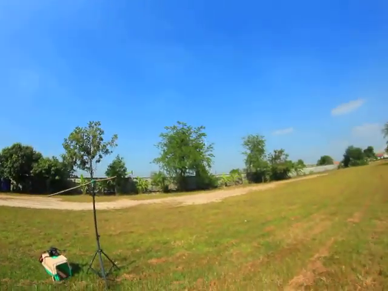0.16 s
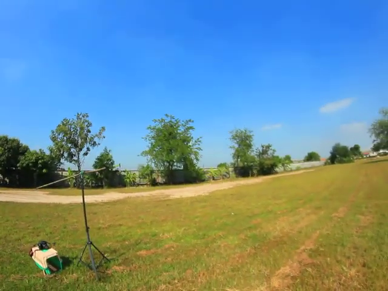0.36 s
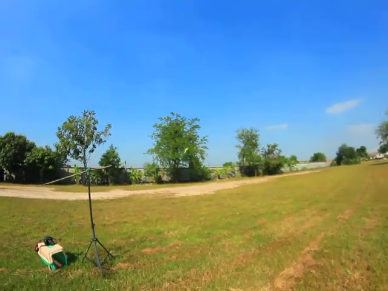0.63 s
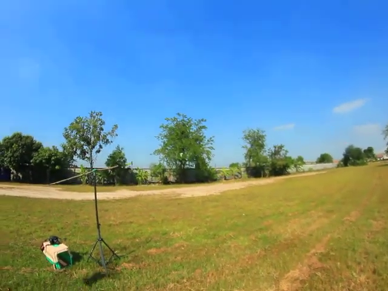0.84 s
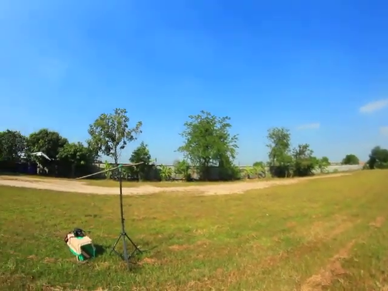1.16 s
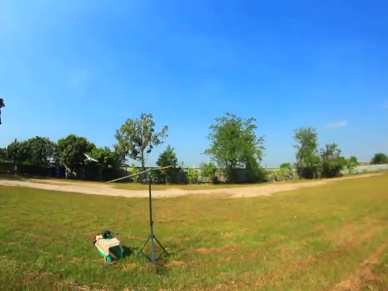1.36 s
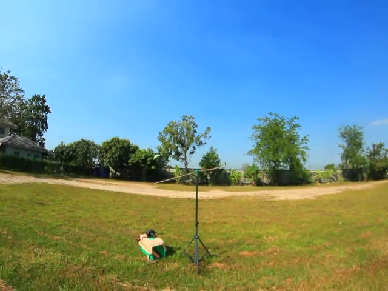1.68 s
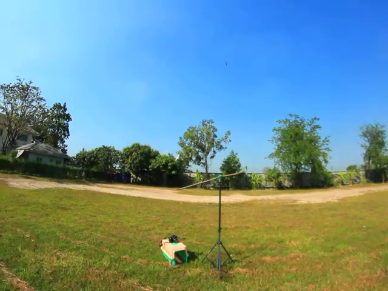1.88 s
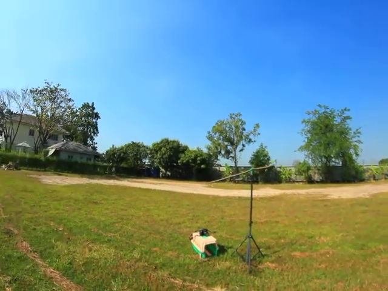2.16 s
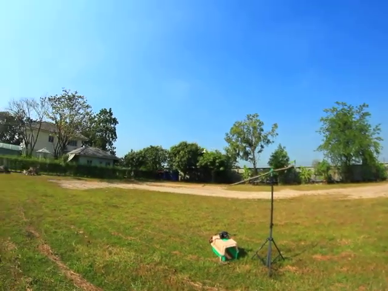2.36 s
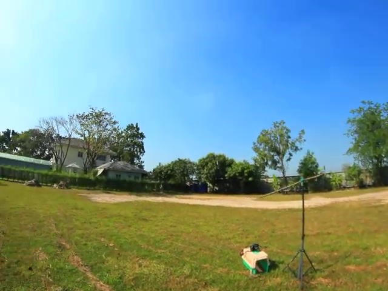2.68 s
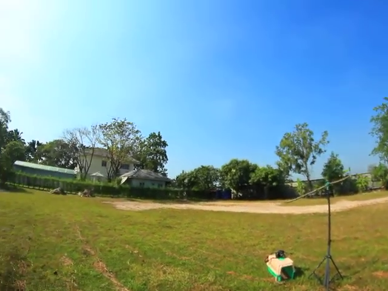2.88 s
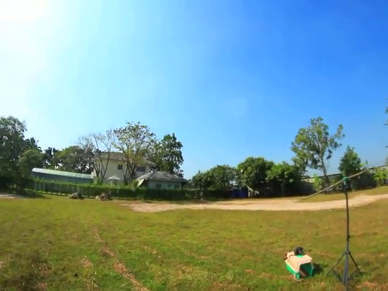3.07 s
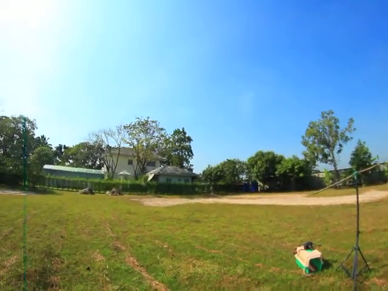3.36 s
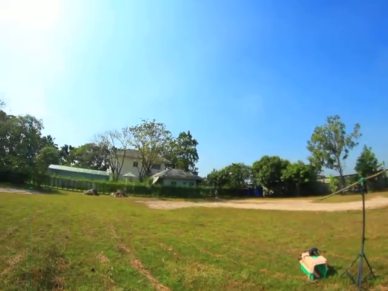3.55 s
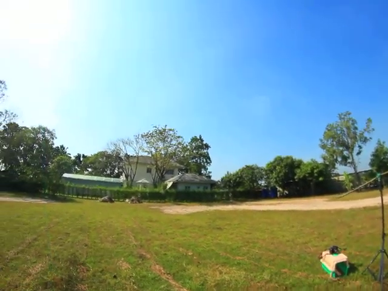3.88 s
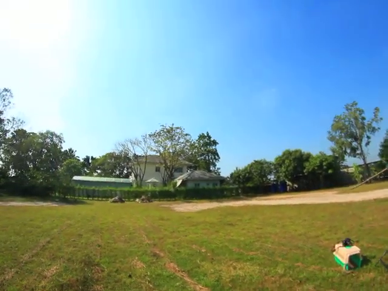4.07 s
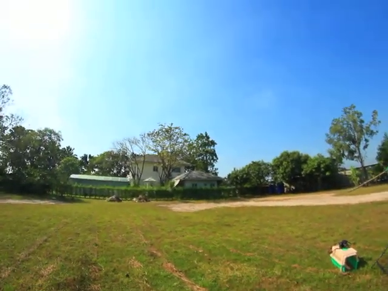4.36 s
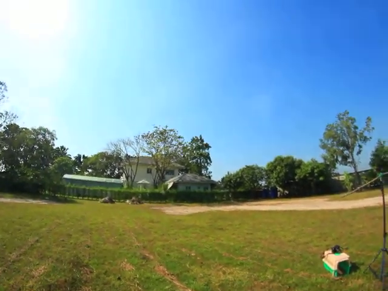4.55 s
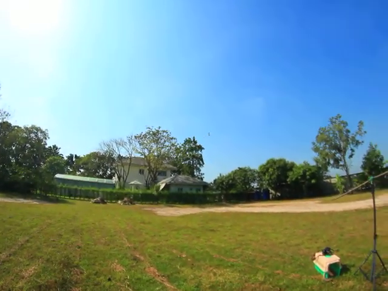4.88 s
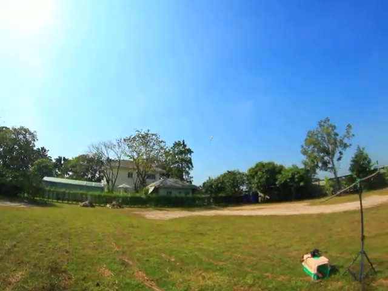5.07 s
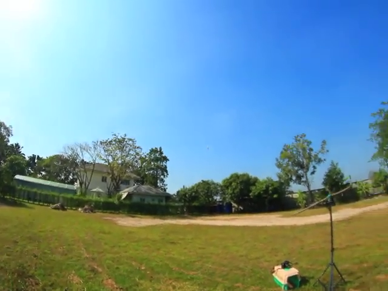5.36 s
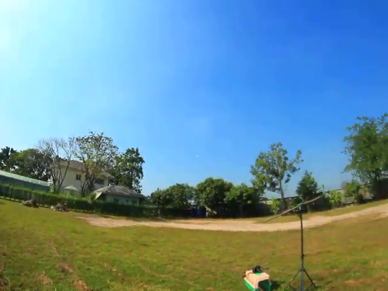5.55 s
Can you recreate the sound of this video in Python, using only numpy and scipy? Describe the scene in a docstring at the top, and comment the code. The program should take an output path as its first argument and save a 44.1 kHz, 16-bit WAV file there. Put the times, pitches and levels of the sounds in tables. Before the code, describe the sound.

A mono outdoor scene in an open grassy field, with a soft, low background hush. In the first second, faint far galah cockatoos give thin, high held notes that slur downward, with a slight grass rustle near 0.8 s. At 1.5 and 1.7 s nearer birds shriek loudly: quick, piercing two-note cries that crack and end in a rasp. A wind thump lands near 1.95 s. From 2.2 to 2.6 s comes a rapid tangle of squeaky whistles and shrill buzzes, then low throaty squawks and piping until 3.1 s, when a long harsh screech grates for a third of a second. A lull follows, with a wind bump at 3.7 s and tiny rising chirps. A far call at 3.95 s leads to piping, another shriek and a longer screech around 4.25 s. Gusts rumble on; a faint call and a final shriek come near 5.5 s. Light echoes trail the calls.

```python
"""Far galah cockatoos call first, held notes that slur downward, over the soft hush of an open field.
Nearer galahs then join in: two-note shrieks that crack and end in a rasp, low squawks, long harsh screeches.
Pure notes are unsteady sines; harsh ones are trains of sharp pulses with puffs of air, shaped by a throat.
A small bird chirps in rising sines, and trees and houses throw the calls back as echoes and a noisy tail.
Gusts buffet the microphone as swells of low, filtered noise."""
import sys
import numpy as np
from scipy import signal
from scipy.fft import rfft, irfft, next_fast_len
from scipy.io import wavfile
from scipy.ndimage import uniform_filter1d

SR = 44100
rng = np.random.default_rng(int(sys.argv[2]) if len(sys.argv) > 2 else 0)


def log_audio(samples):
    """Write samples as a 16-bit WAV file to the path given in sys.argv[1]."""
    # one column per channel
    frames = np.atleast_2d(samples).T
    # limit to full scale, then quantise
    limited = np.clip(frames, -1, 1)
    pcm = np.round(limited * 32767).astype(np.int16)
    wavfile.write(sys.argv[1], SR, pcm)


N = 252252
TIME = np.arange(N) / SR   # seconds
CUTOFF_HZ = 15700   # nothing much is heard above this

# short whistles among the rasps, the first inside the far bird's burst: (start_s, length_s, first_pitch_hz,
# last_pitch_hz, level_db)
WHISTLES = [ (0.415, 0.025, 3540, 3030, -34), (2.222, .016, 3110, 3420, -23),
            (2.263, 0.031, 4360, 4400, -19.5), (2.284, 0.03, 3860, 3680, -23),
            (2.309, 0.073, 2855, 2740, -29.5), (2.357, 0.036, 4100, 3900, -27),
            (2.422, 0.053, 3870, 4180, -26.5), (2.468, 0.021, 4920, 5280, -20.5),
            (2.499, 0.016, 6500, 5900, -28.5), (2.501, 0.011, 4180, 4150, -23),
            (2.517, .014, 5040, 4570, -23), (4.372, 0.083, 5466, 5280, -32.5),
            (5.681, .026, 2780, 3030, -29)]
# shrill rasps, the first a faint rough burst from a far bird: (start_s, length_s, first_pulse_rate_hz,
# last_pulse_rate_hz, level_db, # swell_db over the length, roughness 0-1)
RASPS = [ (0.407, 0.0324, 862, 730, -45, 4, 0.74), (1.458, .016, 990, 1000, -40, -2, 0),
         (1.694, 0.026, 698, 736, -21, 20, 0.84), (2.199, 0.029, 547, 631, -25, 14, .15),
         (2.224, 0.046, 625.5, 731, -19.5, -3, 0.62), (2.285, 0.033, 896, 794, -24, -3, 0.8),
         (2.306, .075, 731, 658, -24.5, -12, .95), (2.377, .046, 880, 998, -28.5, 1, 0.47),
         (2.422, .060, 942, 1276, -26.5, -3, 0.7), (2.532, 0.078, 1015, 1029, -33.5, -1, 0.5),
         (4.033, 0.035, 700, 734, -40.5, 3, .95), (4.244, 0.022, 690, 740, -33, 2, 0.92),
         (5.645, 0.04, 990, 1000, -37, 9, 0.77)]
# the near birds sound duller when they face away: (time_s, treble_db)
FACING = [(1.9, -5), (2.2, -11), (2.55, -7), (4.3, -2.5), (5.55, -5)]


def near_galahs():
    """Shrieks, and whistles among shrill rasps, with a treble that follows where the birds face. The faint
    rough burst near 0.41 s comes from a far bird but is played the same way."""
    calls = shrieks()
    for start, length, first_hz, last_hz, db in WHISTLES:
        hz = glide(length, first_hz, last_hz, arch=0.0087)
        tone = whistle(hz, jitter=0.014, flutter_db=4.5, overtone_db=-21)
        add(calls, start, tone, db, attack=0.0029, release=0.006)
    for start, length, first_hz, last_hz, db, swell_db, rough in RASPS:
        buzz = rasp(glide(length, first_hz, last_hz), rough)
        add(calls, start, buzz, db, attack=0.006, release=0.0077, swell_db=swell_db)
    body, treble = split(calls, hz=6050)
    treble_gain = from_db(np.interp(TIME, *np.transpose(FACING)))
    return outdoors(body + treble_gain * treble, scatter_db=-11.5, t60=0.75, ground_db=-34)


LEAP_S = 0.004   # time scale of the leap, the crack's dip and the final drop
CRACK_S, CRACK_PULSES_HZ, CRACK_SWELL_DB = 0.019, (1018, 1114), 4
CLOSING_S, CLOSING_PULSES_HZ, CLOSING_FADE_DB = 0.0318, (884, 776.4), -8
CROAK_DB = -8   # the low croak, relative to the start of the closing rasp
FUNDAMENTAL_DB = -14.5   # the pulse rate itself hums under a crack or a closing rasp
# a shriek is a scooping lead-in, a leap to two arched notes with a crack between them, and a closing rasp:
# (start_s, lead_in_s, first_note_s, second_note_s, lead_in_pitch_hz, first_pitch_hz, crack_pitch_hz,
#  second_pitch_hz, last_pitch_hz, lead_in_level_db, notes_level_db, crack_level_db, closing_level_db)
SHRIEKS = [ (1.462, .027, 0.039, 0.052, 3980, 5480, 5090, 5710, 5290, -26, -15, -21.5, -18),
           (1.717, 0.024, .051, .053, 4170, 5620, 5090, 5690, 5550, -12.5, -14.5, -14, -19.5),
           (4.246, .025, .052, .050, 3900, 5370, 5230, 5514, 5320, -28.5, -21.5, -26.5, -28),
           (5.588, .012, 0.023, .083, 3380, 4980, 4734, 4840, 4840, -16.5, -17, -24, -27)]


def shrieks():
    """Each shriek buzzes where it cracks and collapses into a rasp with a low croak."""
    out = np.zeros(N)
    cracking = glide(CRACK_S, *CRACK_PULSES_HZ)
    closing = glide(CLOSING_S, *CLOSING_PULSES_HZ)
    for start, lead, first, second, *pitches, lead_db, db, crack_db, closing_db in SHRIEKS:
        crack = start + lead + first
        end = crack + second
        tone = shriek_tone(lead, first, second, *pitches, lead_db, db)
        add(out, start, tone, 0, attack=0.005, release=0.0034)
        add(out, crack, rasp(cracking, rough=0.42), crack_db,
            attack=0.0035, release=0.0068, swell_db=CRACK_SWELL_DB)
        # half the fade is added so that the rasp fades from its listed level
        add(out, end - LEAP_S / 2, rasp(closing, rough=0.6), closing_db + CLOSING_FADE_DB / 2,
            attack=0.0031, release=0.0066, swell_db=CLOSING_FADE_DB)
        add(out, end, squawk(closing, rough=0.053), closing_db + CROAK_DB, attack=0.0099, release=0.0075)
        for hum_start, hz, level_db in (crack, cracking, crack_db), (end, closing, closing_db):
            hum = whistle(hz, jitter=0.014, flutter_db=1.5, overtone_db=-21)
            add(out, hum_start, hum, level_db + FUNDAMENTAL_DB, attack=0.0046, release=0.011)
    return out


# shares of pitch: the lead-in curls up, the first note starts flat
LEAD_IN_SCOOP, FIRST_NOTE_SCOOP = 0.085, 0.051
SCOOP_S = 0.0054   # the first note closes most of its gap in pitch this fast
# each note swells, the second by half as much; the tone sinks in the crack
FIRST_NOTE_DB, SECOND_NOTE_DB, SWELL_DB, CRACK_DIP_DB = -2, -0.5, 9, -4.5
LEAD_IN_OVERTONE_DB, NOTE_OVERTONE_DB = -11.5, -20.5   # the high notes are purer than the lead-in


def shriek_tone(lead, first, second, lead_hz, first_hz, crack_hz, second_hz, last_hz, lead_db, db):
    """The pure tone of a shriek: it leaps up from the lead-in, sags into the crack, arches again and drops."""
    crack, end = lead + first, lead + first + second
    t = np.arange(int((end + LEAP_S) * SR)) / SR
    # progress through each part, 0 to 1
    in_lead, in_first, in_second = np.clip([t / lead, (t - lead) / first, (t - crack) / second], 0, 1)
    curling = lead_hz * (1 + LEAD_IN_SCOOP * in_lead ** 2)
    falling = first_hz + (crack_hz - first_hz) * in_first ** 3
    falling = falling * (1 - FIRST_NOTE_SCOOP * np.exp(-in_first * first / SCOOP_S))
    arched = np.polyval(np.polyfit([0, 0.5, 1], [crack_hz, second_hz, last_hz], 2), in_second)
    notes_hz = np.where(t < crack, falling, arched)

    first_db = FIRST_NOTE_DB + SWELL_DB * (in_first - 0.5)
    second_db = SECOND_NOTE_DB + SWELL_DB * (in_second - 0.5) / 2
    notes_db = uniform_filter1d(db + np.where(t < crack, first_db, second_db), size=100)
    notes_db = notes_db + CRACK_DIP_DB * np.exp(-((t - crack - LEAP_S) / LEAP_S) ** 2)

    # 0 on the lead-in pitch, 1 on the high notes, and back to 0 for the drop
    upper = np.interp(t, [lead - LEAP_S / 2, lead + LEAP_S / 2, end - LEAP_S / 2, end + LEAP_S], [0, 1, 1, 0])
    hz = upper * notes_hz + (1 - upper) * curling
    level_db = upper * notes_db + (1 - upper) * lead_db
    overtone_db = upper * NOTE_OVERTONE_DB + (1 - upper) * LEAD_IN_OVERTONE_DB
    return from_db(level_db) * whistle(hz, jitter=0.0099, flutter_db=3.43, overtone_db=overtone_db)


# throat colour of a rasp: (frequency_hz, level_db)
RASP_THROAT = [(500, -20.5), (1050, -13), (1900, -21), (2800, -1.5), (4000, 4), (5400, -0.5), (6500, 1),
               (8500, -5), (11000, -16), (16000, -27)]


def rasp(hz, rough):
    """The shrill, buzzing register: fast pulses through a bright throat."""
    return pulsed(hz, rough, RASP_THROAT, jitter=0.0586, jitter_rate=500, shimmer_db=1.0, hiss=1.6, wander=0.08)


SCREECH_ATTACK_S, SCREECH_RELEASE_S, SCREECH_ROUGHNESS = 0.034, 0.021, 0.58
SCREECH_WOBBLE = 0.022   # typical share of pitch by which a whole screech wavers
# low squawks: (start_s, length_s, first_pulse_rate_hz, last_pulse_rate_hz, level_db, roughness 0-1)
SQUAWKS = [ (2.723, 0.096, 266.2, 282.6, -20.5, 0.39), (2.814, 0.087, 675, 765, -23.5, 0.23),
           (2.878, 0.046, 873, 879, -13, 0.16), (2.915, 0.023, 919, 1065, -16.5, 0.38),
           (2.925, 0.029, 841, 730, -20.5, 0.8), (3.039, 0.055, 702, 644, -23.5, 0.38),
           (4.171, 0.087, 572, 632, -32, 0.47)]
# clear piping notes from other birds of the flock:
# (start_s, length_s, first_pitch_hz, last_pitch_hz, level_db)
PIPES = [ (0.175, .040, 2740, 2800, -42), (0.374, 0.053, 1920, 1700, -42.5),
         (2.837, 0.046, 2830, 3060, -27.5), (3.055, 0.082, 2990, 2948, -27.5),
         (3.150, 0.051, 2830, 2720, -27), (3.931, 0.025, 2300, 3170, -39), (4.071, 0.058, 4150, 3770, -31),
         (4.129, 0.078, 2670, 2618, -29), (4.183, 0.0755, 1143, 1290, -29.5),
         (4.289, 0.039, 2717, 2704, -27)]
# long harsh screeches, arched in pitch:
# (start_s, length_s, first_pulse_rate_hz, last_pulse_rate_hz, arch as a share of pitch, level_db)
SCREECHES = [(3.108, .304, 440.8, 536, 0.01013, -17.5), (4.257, .392, 428.3, 450, .19, -18)]
# partials that ring out of a screech: (multiple of the pulse rate, level_db)
SCREECH_PARTIALS = [(2, -25.5), (3, -14.5), (4, -11.5), (6, -28)]


def squawking_galahs():
    """Low pulsed squawks, nearly pure piping notes and long rough screeches with ringing partials."""
    calls = np.zeros(N)
    for start, length, first_hz, last_hz, db, rough in SQUAWKS:
        voice = squawk(glide(length, first_hz, last_hz), rough)
        add(calls, start, voice, db, attack=0.23 * length, release=0.16 * length, swell_db=6.5)
    for start, length, first_hz, last_hz, db in PIPES:
        tone = whistle(glide(length, first_hz, last_hz), jitter=0.012, flutter_db=4.0, overtone_db=-28)
        add(calls, start, tone, db, attack=0.017, release=0.0065)
    for start, length, first_hz, last_hz, arch, db in SCREECHES:
        hz = glide(length, first_hz, last_hz, arch)
        hz = hz * (1 + SCREECH_WOBBLE * waver(len(hz), 35.01))
        harsh = screech(hz, SCREECH_ROUGHNESS, second_ratio=1.24, second_db=-3)
        ringing = sum(from_db(partial_db) * whistle(k * hz, jitter=0.013, flutter_db=5.5, overtone_db=-38)
                      for k, partial_db in SCREECH_PARTIALS)
        add(calls, start, opening_beak(harsh) + ringing, db, SCREECH_ATTACK_S, SCREECH_RELEASE_S)
    return outdoors(calls, scatter_db=-6, t60=0.82, ground_db=-13.5)


# throat colour of a squawk: (frequency_hz, level_db)
SQUAWK_THROAT = [(300, -31), (600, -25.5), (850, -16.5), (1400, 3.5), (1800, 6), (2450, -10), (3000, -9),
                 (4500, -18), (7000, -34.5), (12000, -58)]


def squawk(hz, rough):
    """The low, throaty register: pulses through a darker throat."""
    return pulsed(hz, rough, SQUAWK_THROAT, jitter=0.11, jitter_rate=400, shimmer_db=7, hiss=3.0, wander=0.07)


# throat colour of a screech: (frequency_hz, level_db)
SCREECH_THROAT = [(350, -32), (600, -29.5), (829, -48), (974, -7.5), (1310, -6), (1440, -3), (1960, 0.5),
                  (2250, -8.5), (2710, -9), (3190, -15), (3750, -11), (5540, -27.5), (5920, -31.5),
                  (6690, -31), (15000, -67)]
# beak and windpipe resonances of a screech: (frequency_hz, width_hz, level_db)
SCREECH_MODES = [(1380, 59, -13), (2760, 150, 3.5)]


def screech(hz, rough, second_ratio, second_db):
    """Two membranes flap at unrelated rates, so their partials cross and tear."""
    first, second = [
        pulsed(hz * ratio, rough, SCREECH_THROAT, jitter=0.0457, jitter_rate=450, shimmer_db=0.0,
               hiss=1.0, wander=0.09, modes=SCREECH_MODES)
        for ratio in (1, second_ratio)]
    return rms_one(first + from_db(second_db) * second)


BEAK_OPEN_DB, BEAK_SHUT_DB = 1.5, -4   # treble of a screech at its middle and at its ends


def opening_beak(sound):
    """The beak opens and closes over a screech, so its middle is brightest."""
    body, treble = split(sound, hz=3050)
    gape = np.sin(np.pi * np.linspace(0, 1, len(sound)))
    return body + from_db(BEAK_SHUT_DB + (BEAK_OPEN_DB - BEAK_SHUT_DB) * gape) * treble


HOLD_SAG = 0.0363   # share of pitch lost from start to end of the held note
SLUR_HZ_PER_S, SLUR_END_HZ = 7100, 1650   # average fall, and the pitch where the slur ends
# far calls, a held note and then a downward slur:
# (start_s, hold_s, held_pitch_hz, held_level_db, slur_top_pulse_rate_hz, slur_level_db)
FAR_CALLS = [ (-.02, 0.098, 3895, -37, 2693, -40.5), (.262, .052, 3930, -38.5, 2598, -40.5),
             (0.361, 0.092, 3800, -42.5, 2690, -42.5), (0.897, 0.1, 3900, -39, 2655, -39),
             (3.947, .102, 4006, -33.5, 2984, -34.5), (5.447, 0.16, 3773, -40, 2500, -49)]
# throat colour of the far slur: (frequency_hz, level_db)
FAR_THROAT = [(400, -42), (1300, 16), (2000, -3), (2700, 8), (3900, 7.5), (5000, 1), (6000, -11),
              (8000, -21), (11000, -21), (16000, -46)]


def far_galahs():
    """A nearly pure held note, then a pulsed slur, with more of the surroundings on them."""
    calls = np.zeros(N)
    for start, hold, held_hz, held_db, top_hz, slur_db in FAR_CALLS:
        held = glide(hold, held_hz, held_hz * (1 - HOLD_SAG), arch=0.00944)
        tone = whistle(held, jitter=0.01, flutter_db=3.5, overtone_db=-26.5)
        add(calls, start, tone, held_db, attack=0.017, release=0.0062)
        slur_length = (top_hz - SLUR_END_HZ) / SLUR_HZ_PER_S
        slur = glide(slur_length, top_hz, SLUR_END_HZ, arch=0.04)
        voice = pulsed(slur, 0.25, FAR_THROAT, jitter=0.05, jitter_rate=800, shimmer_db=12, hiss=2.9, wander=0.07)
        add(calls, start + hold, voice, slur_db, attack=0.004, release=0.016, swell_db=5.5)
    return outdoors(calls, scatter_db=-1.5, t60=0.76, ground_db=-14)


CHIRP_S, CHIRP_HZ = 0.08, (6380, 8580)   # length, first and last pitch
# a small bird's rising chirps: (start_s, level_db)
CHIRPS = [(0.424, -53), (1.955, -49), (3.685, -52.5), (3.816, -44.5)]


def small_bird():
    """Each chirp is a nearly pure tone that slides up, slowly at first."""
    chirps = np.zeros(N)
    for start, db in CHIRPS:
        tone = whistle(glide(CHIRP_S, *CHIRP_HZ, arch=-0.03), jitter=0.019, flutter_db=2.5, overtone_db=-30)
        add(chirps, start, tone, db, attack=0.029, release=0.017)
    return outdoors(chirps, scatter_db=-10, t60=0.3, ground_db=-10)


# echoes from trees and houses: (delay_s, level_db)
ECHOES = [(.064, -13.5), (.118, -18.5)]
# colour of the scattered tail: (frequency_hz, level_db)
TAIL_COLOUR = [(300, -49), (1500, -2.5), (5500, 3), (8000, 0), (15000, -2.5)]


def outdoors(x, scatter_db, t60, ground_db):
    """A ground bounce, far echoes and a thin tail scattered by foliage, falling 60 dB in t60 seconds."""
    t = TIME[:SR]
    tail = coloured(rng.standard_normal(SR), TAIL_COLOUR)
    tail = tail * from_db(-60 * t / t60) * (1 - np.exp(-t / 0.022))
    scattered = signal.fftconvolve(x, tail / np.sqrt(np.sum(tail ** 2)))[:N]
    ground_bounce = (0.0043, ground_db)
    echoes = sum(from_db(db) * np.interp(TIME - delay, TIME, x, left=0)
                 for delay, db in [*ECHOES, ground_bounce])
    return x + echoes + from_db(scatter_db) * scattered


BREEZE_DB = -47.5   # between the gusts
# colour of the wind: (frequency_hz, level_db)
WIND_COLOUR = [(12, -38), (20, -7.5), (75, 6.5), (107, 3.5), (157, -1.5), (203, -7.5), (248, -7),
               (325, -23.5), (485, -21.5), (600, -36.5), (780, -55), (1320, -120)]
# level of the deep bass in the wind: (time_s, level_db)
WIND_BASS = [(1.95, 2), (3.35, 2.5), (3.7, -13.5), (3.9, 3), (4.3, -1), (5.7, -1)]
# gusts and sudden buffets on the microphone: (middle_s, level_db, spread_s)
GUSTS = [(1.930, -34, 0.023), (1.953, -16.5, 0.0048), (2.035, -34.5, .007), (2.086, -24.5, 0.0034),
         (3.37, -31, 0.05), (3.712, -17, 0.006), (3.76, -25.5, 0.071), (4.005, -36.5, 0.024),
         (4.275, -26, 0.031), (4.51, -25.5, 0.038), (4.63, -32, 0.06), (4.89, -29, 0.049),
         (5.035, -33.5, 0.034), (5.275, -27.5, 0.012), (5.335, -27.5, 0.016), (5.415, -29.5, 0.028),
         (5.535, -26.5, 0.02), (5.685, -32, 0.029)]


def wind():
    """Lumpy rumble of air at the microphone: a light breeze with gusts on top."""
    eddies = noise(WIND_COLOUR)
    # even pressure, so the gusts set the level
    eddies = eddies / np.sqrt(uniform_filter1d(eddies ** 2, size=1500) + 0.043)
    large, small = split(eddies, hz=92)
    eddies = from_db(np.interp(TIME, *np.transpose(WIND_BASS))) * large + small
    strength = np.hypot(from_db(BREEZE_DB), bursts(GUSTS))
    flutter = from_db(1.2 * waver(N, 45))
    return strength * flutter * eddies


# colour of the far hush: (frequency_hz, level_db)
FIELD = [(88, -56), (150, -3), (217, -5), (269, -2), (297, 0.5), (649, -6), (836, -1), (1100, -4.5),
         (1760, -8.5), (2600, -16.5), (3280, -18), (3760, -22), (5240, -25.5), (14500, -36.5), (16000, -29)]
# level of the far hush before a 5 dB lift: (time_s, level_db)
FIELD_DB = [(0.0, -43), (0.22, -47), (1.23, -43.5), (1.62, -47), (2.66, -48), (3.01, -45), (3.66, -46.5),
            (4.06, -42.5), (5.18, -44), (5.72, -44.5)]
# soft rustles in the grass: (middle_s, level_db, spread_s)
RUSTLES = [(.79, -43, 0.012), (.87, -42, 0.026)]
# colour of the rustles: (frequency_hz, level_db)
RUSTLE_COLOUR = [(500, 3), (2800, 5.5), (6000, -7.5), (15000, -14)]


def field():
    """The far hush of open country and a little rustling grass, both filtered noise."""
    hush_db = np.interp(TIME, *np.transpose(FIELD_DB)) + 5.0
    hush = from_db(hush_db) * noise(FIELD)
    return hush + bursts(RUSTLES) * noise(RUSTLE_COLOUR)


def whistle(hz, jitter, flutter_db, overtone_db):
    """The bird's voice box (syrinx) at its purest: an unsteady sine whose overtones fall in equal steps."""
    phase = 2 * np.pi * np.cumsum(hz * (1 + jitter * waver(len(hz), 705.3))) / SR
    tone = sum(from_db(overtone_db * (k - 1)) * np.sin(k * phase) * (k * hz < SR / 2) for k in range(1, 4))
    return rms_one(tone) * from_db(flutter_db * waver(len(hz), 247))


def pulsed(hz, rough, throat, jitter, jitter_rate, shimmer_db, hiss, wander=0, modes=()):
    """The syrinx snaps shut once a cycle; roughness upsets timing and strength and adds puffs of air."""
    count = len(hz)
    unsteady = jitter * waver(count, jitter_rate) + wander * waver(count, 55)
    phase = 2 * np.pi * np.cumsum(hz * (1 + rough * unsteady)) / SR
    smear = 0.35   # the windpipe delays the higher partials, which spreads each pulse
    highest = int(CUTOFF_HZ / hz.min())
    pulses = rms_one(sum(np.cos(k * phase - smear * k * k) * (k * hz < CUTOFF_HZ)
                         for k in range(1, highest + 1)))
    air = hiss * rough ** 2 * (1 + np.cos(phase)) * rng.standard_normal(count)
    source = (pulses + air) * from_db(shimmer_db * rough * waver(count, 400))
    source = source + sum(from_db(db) * resonance(source, centre, width) for centre, width, db in modes)
    sound = coloured(source, throat)
    # even out the loudness over about 9 ms
    return sound / np.sqrt(uniform_filter1d(sound ** 2, size=400) + 1e-9)


def glide(length, first_hz, last_hz, arch=0):
    """Pitch of one note: a straight slide, bowed upward by a share of itself (downward if negative)."""
    u = np.linspace(0, 1, max(int(length * SR), 256))
    return (first_hz + (last_hz - first_hz) * u) * (1 + arch * 4 * u * (1 - u))


def add(out, start, sound, db, attack, release, swell_db=0):
    """Mix a note in with an attack, a hold that swells or fades, and a release."""
    t = np.arange(len(sound)) / SR
    rise, fall = t / max(attack, 1e-4), (t[-1] - t) / max(release, 1e-4)
    ends = np.clip(np.minimum(rise, fall), 0, 1)
    gain = from_db(db + swell_db * (t / t[-1] - 0.5))
    at = int(start * SR) + np.arange(len(sound))
    inside = (at >= 0) & (at < N)
    out[at[inside]] += (sound * ends * gain)[inside]


def from_db(db):
    """Turn decibels into a gain."""
    return 10 ** (np.asarray(db) / 20)


def rms_one(x):
    """Scale to an average (rms) strength of 1."""
    return x / np.sqrt(np.mean(x ** 2) + 1e-20)


def coloured(x, spectrum):
    """Filter by an outline of (frequency_hz, level_db); average strength 1."""
    hz, db = np.transpose(spectrum)
    size = next_fast_len(len(x) + 1024)
    bins = np.maximum(np.arange(size // 2 + 1) * SR / size, 1)
    gain = from_db(np.interp(np.log(bins), np.log(hz), db))
    return rms_one(irfft(rfft(x, size) * gain, size)[:len(x)])


def noise(spectrum):
    """Steady hiss or rumble of the given colour."""
    return coloured(rng.standard_normal(N), spectrum)


def waver(count, rate):
    """Random drift in straight lines between new values, rate times a second."""
    return np.interp(np.arange(count) * min(rate / SR, 1), np.arange(count), rng.standard_normal(count))


def bursts(rows):
    """Bell-shaped swells of gain."""
    return sum(from_db(db) * np.exp(-0.5 * ((TIME - middle) / spread) ** 2) for middle, db, spread in rows)


def resonance(x, hz, width):
    """Two-pole resonance with gain 1 on top."""
    r = np.exp(-np.pi * width / SR)
    feedback = [1, -2 * r * np.cos(2 * np.pi * hz / SR), r * r]
    return signal.lfilter(np.array([1, 0, -1]) * (1 - r * r) / 2, feedback, x)


def split(x, hz):
    """The parts below and above a frequency."""
    low = signal.sosfiltfilt(signal.butter(4, hz, fs=SR, output="sos"), x)
    return low, x - low


def scene():
    """All birds, the wind and the field together, in one channel."""
    birds = near_galahs() + squawking_galahs() + far_galahs() + small_bird()
    return (birds + wind() + field())[None]


def record(dry):
    """The highest peaks are rounded and the top is cut steeply."""
    rounded = dry / (1 + (dry / 0.66) ** 6) ** (1 / 6)
    return signal.sosfilt(signal.ellip(10, 0.1, 90, CUTOFF_HZ, fs=SR, output="sos"), rounded)


dry = scene()
out = record(dry)
log_audio(out)
```